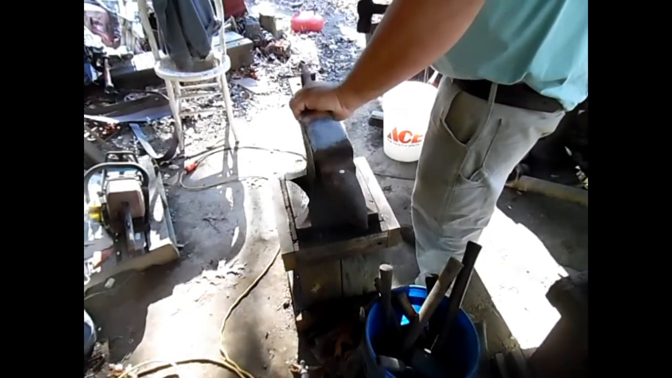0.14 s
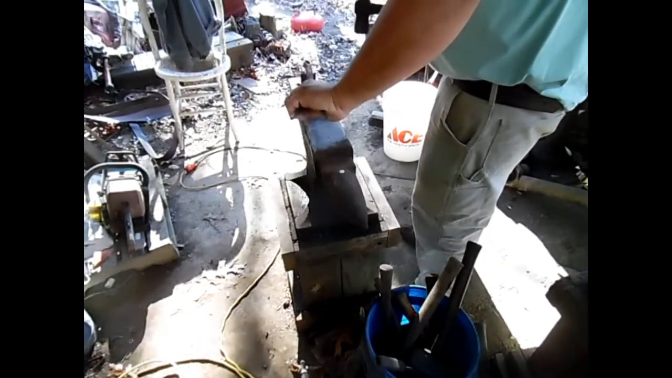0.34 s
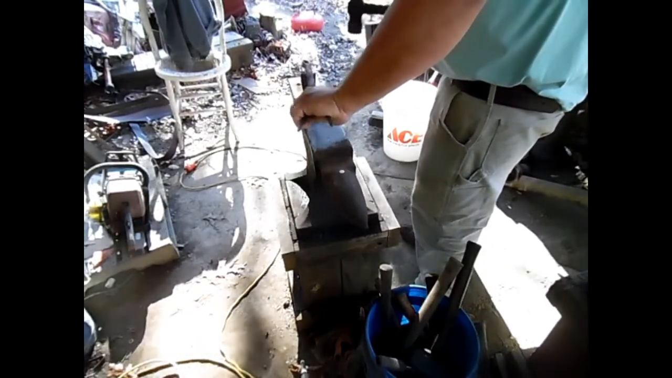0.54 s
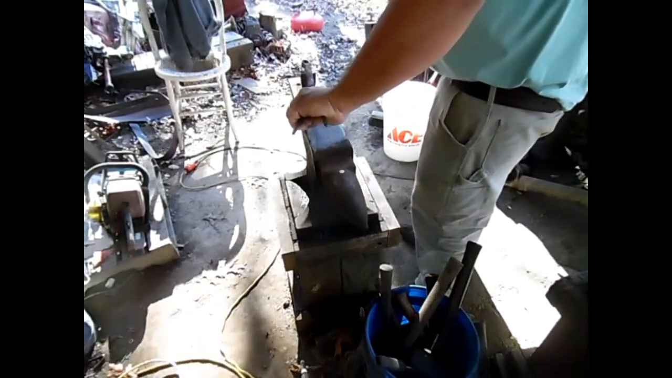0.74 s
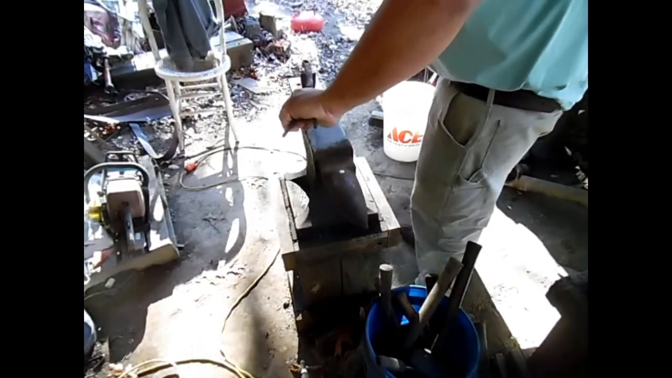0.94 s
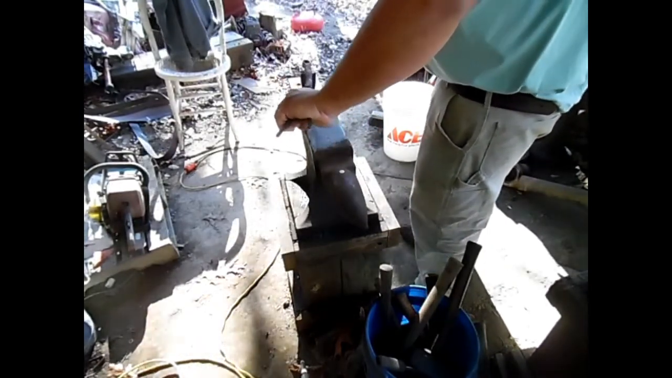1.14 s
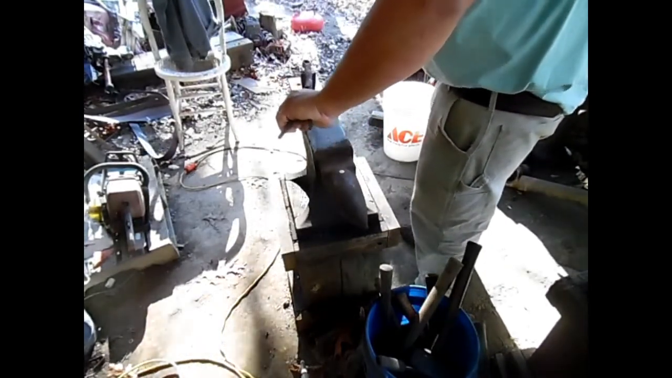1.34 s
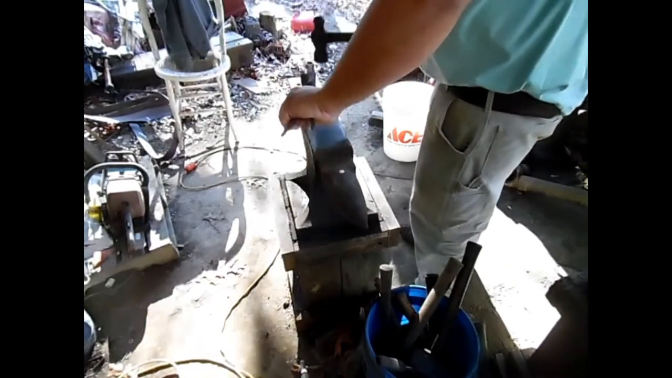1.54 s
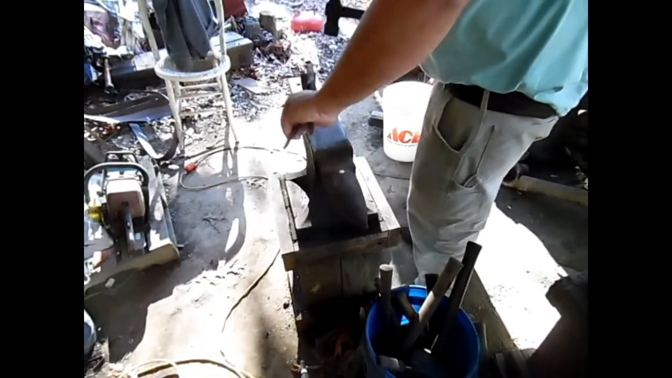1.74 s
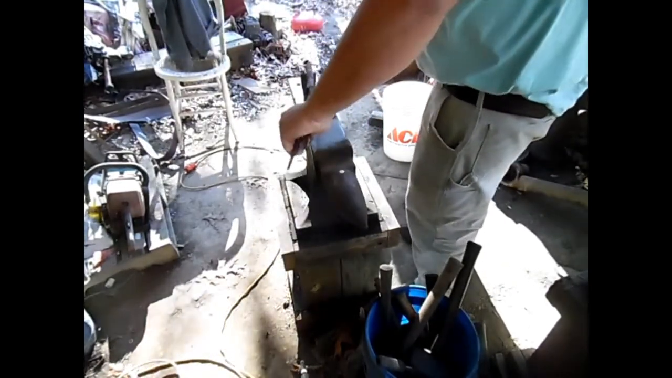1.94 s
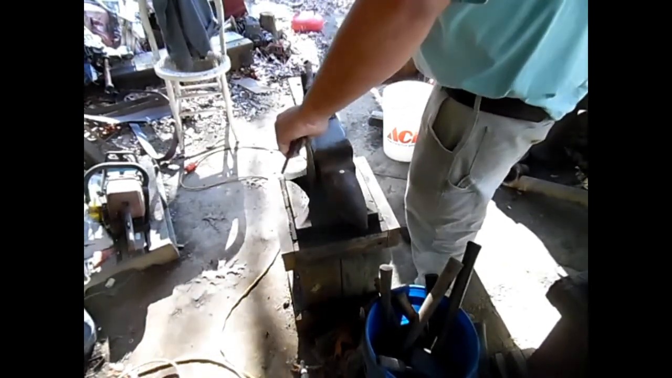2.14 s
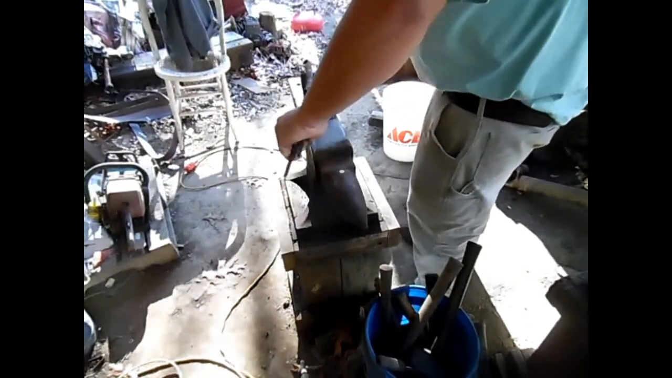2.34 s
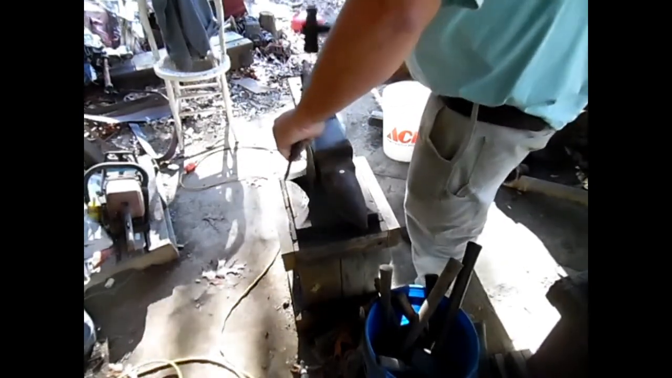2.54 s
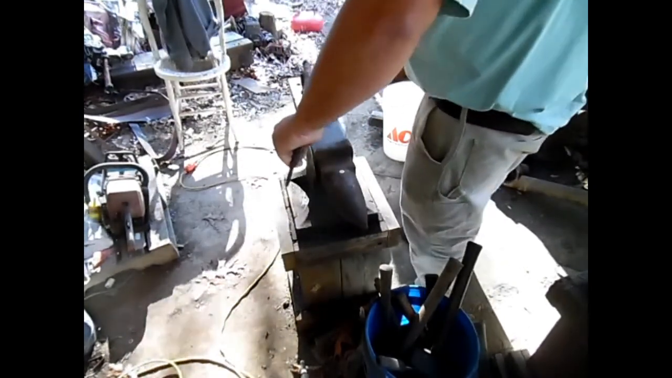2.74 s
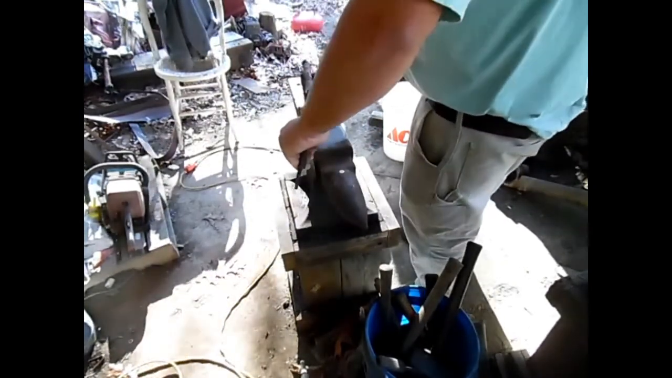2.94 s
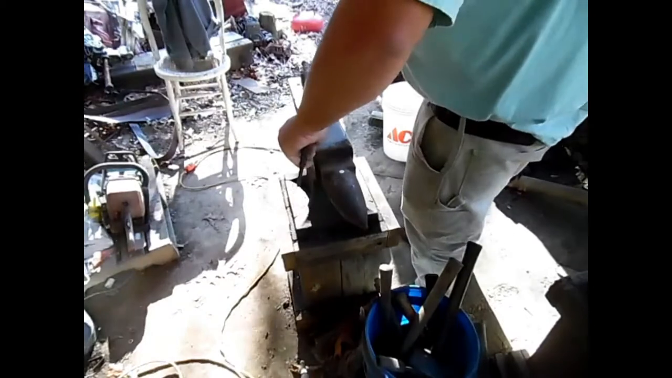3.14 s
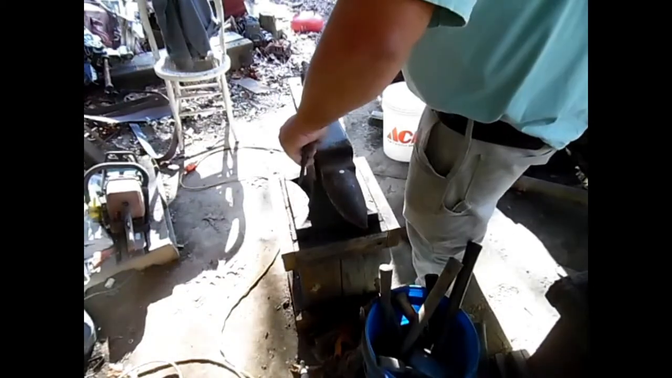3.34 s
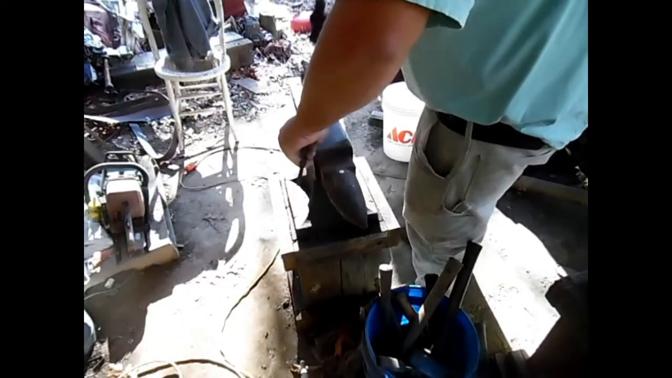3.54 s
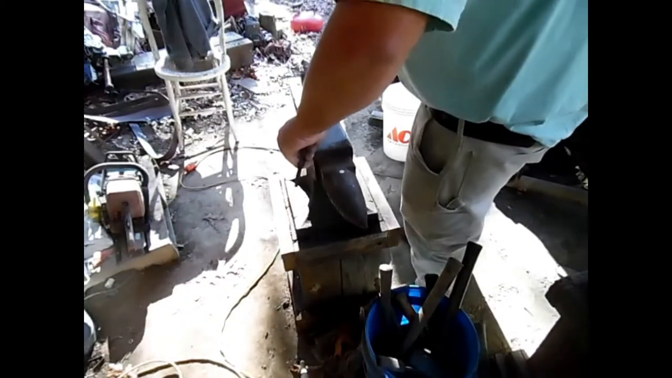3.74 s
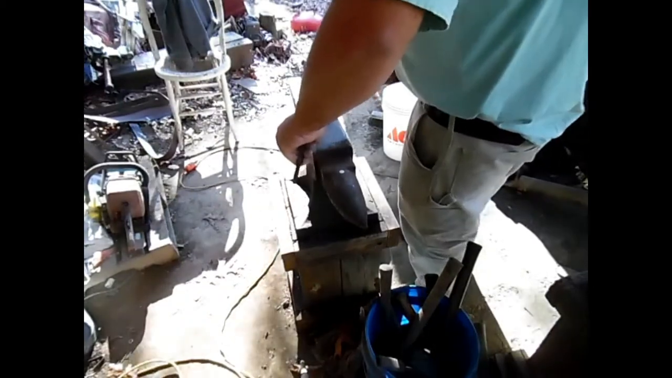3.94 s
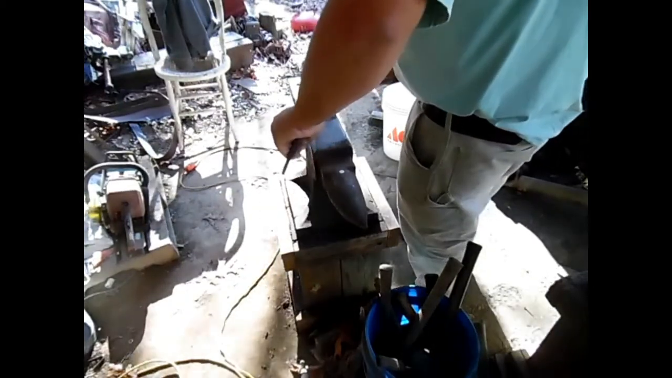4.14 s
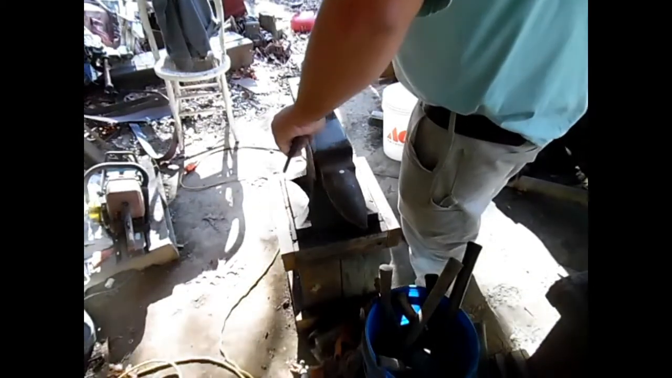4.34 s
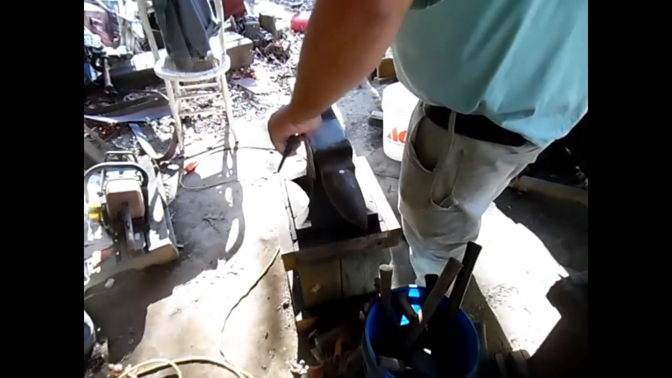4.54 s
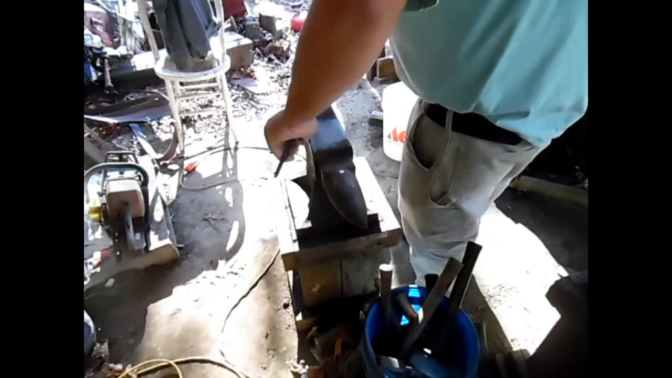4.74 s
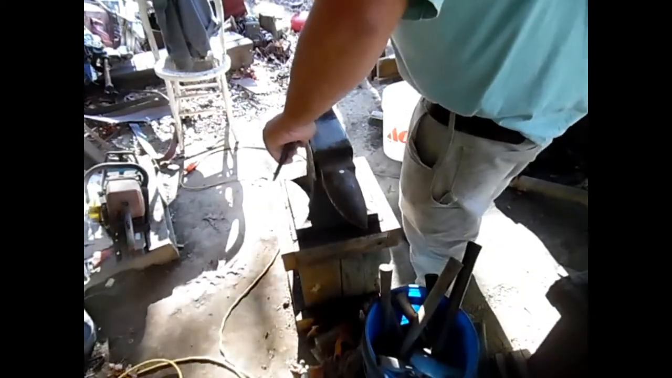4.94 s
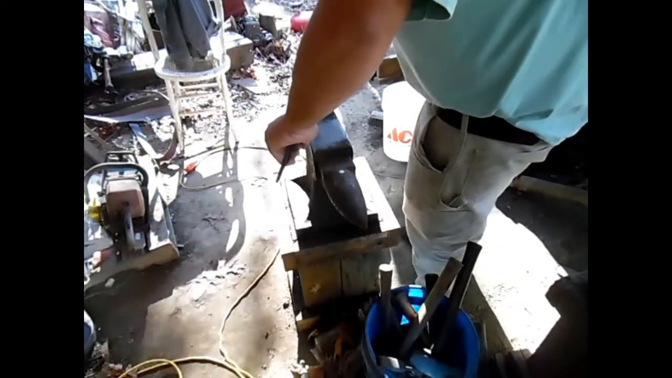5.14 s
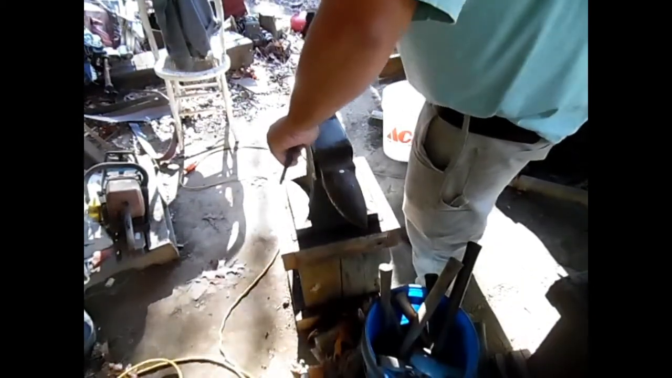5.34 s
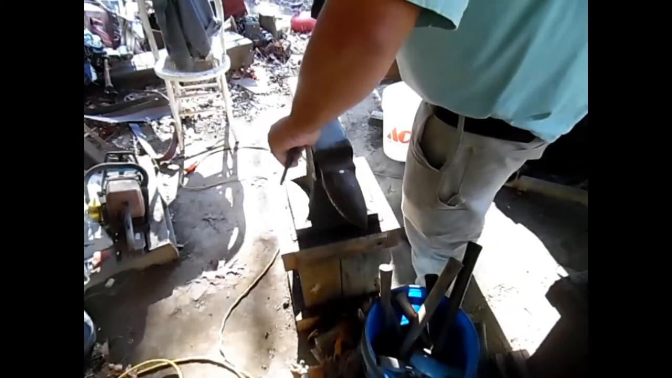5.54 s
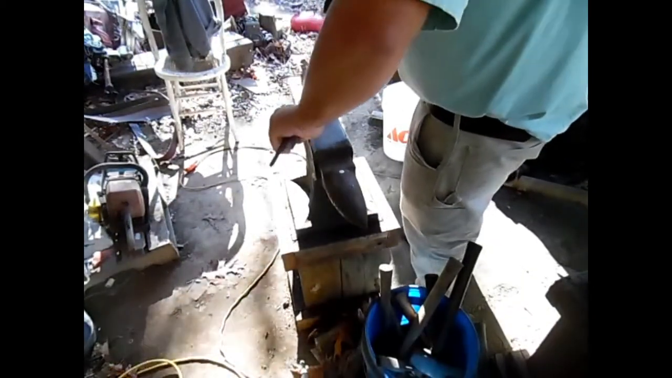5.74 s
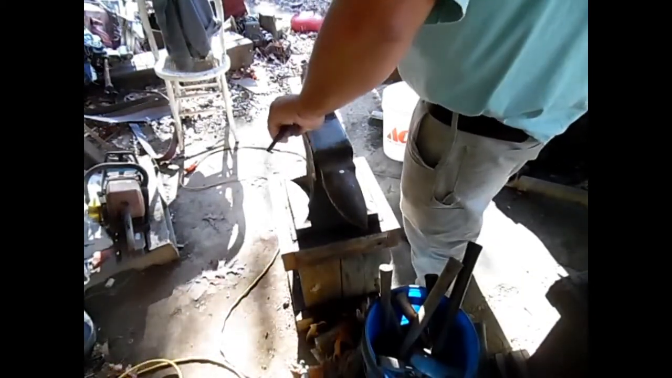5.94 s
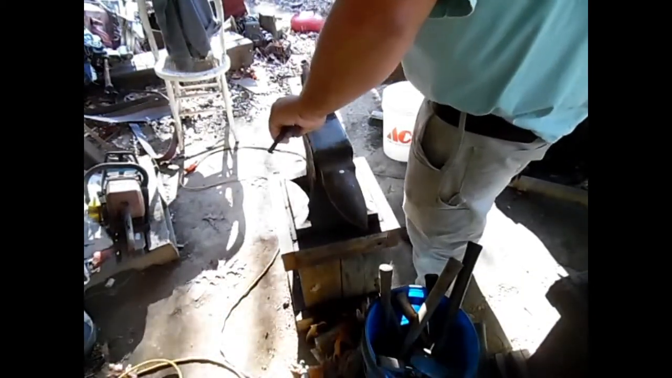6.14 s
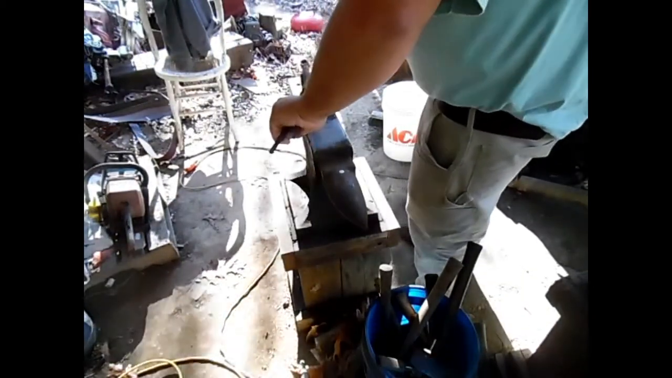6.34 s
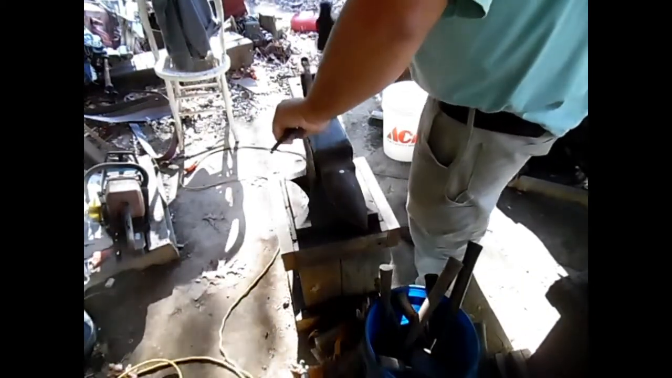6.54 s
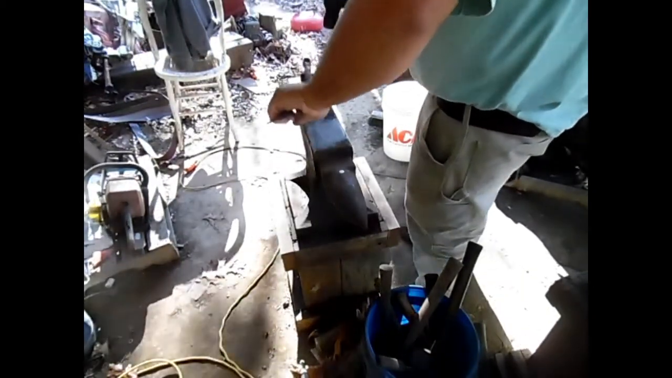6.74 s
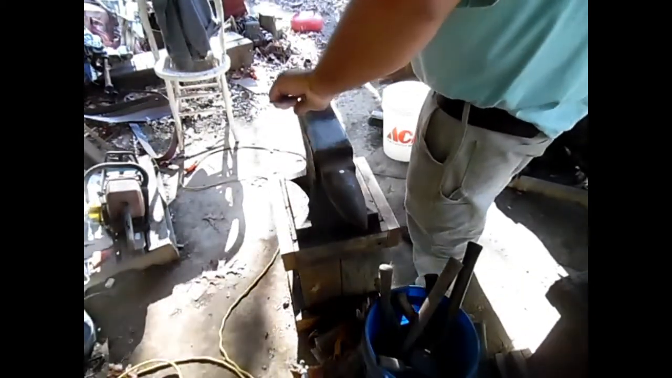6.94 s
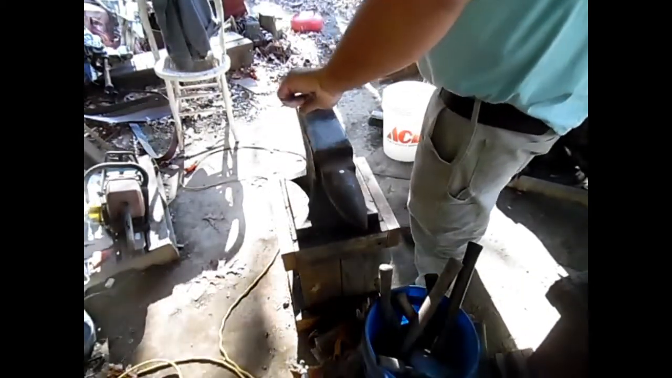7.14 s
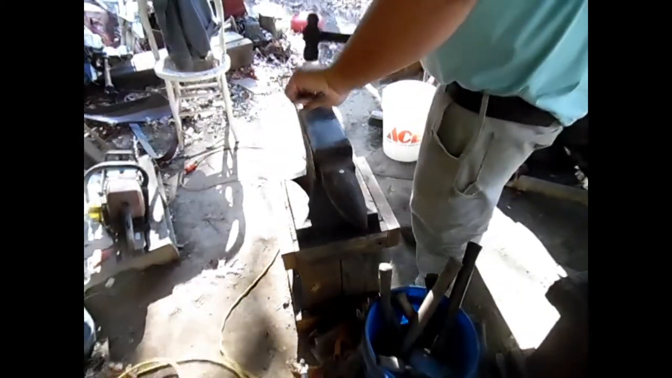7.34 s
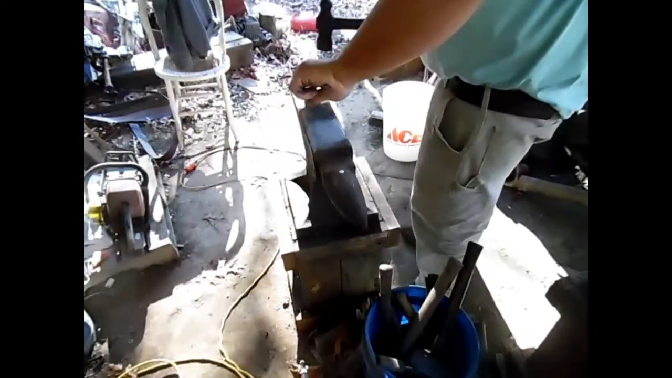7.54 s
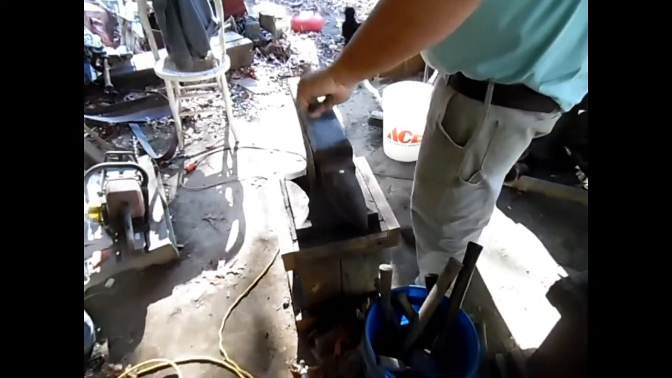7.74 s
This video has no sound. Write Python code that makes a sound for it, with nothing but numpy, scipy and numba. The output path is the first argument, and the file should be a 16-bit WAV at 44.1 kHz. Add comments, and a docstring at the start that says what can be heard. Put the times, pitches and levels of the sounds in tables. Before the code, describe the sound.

Wind starts to buffet the microphone with a low, fluttering rumble over the faint hiss and hum of a forge. Then a hammer lands on steel on a close anvil in an open shed: three sharp, briefly ringing blows about a second apart, a pause, and three more. A few tiny ticks fall in the pause, and faint thin squeals pass near the end as the wind turns raspier.

```python
"""Forging on an anvil

A smith draws out hot steel in an open shed: six hard blows and one light touch, each a crack of contact
and a short ring of the anvil's modes. Turbulent wind buffets the microphone, the forge hisses over its
humming blower, and faint ticks and gliding squeals pass. The blows overload the microphone's signal;
an automatic gain control pulls the level down and lets it creep back."""
import sys
import numpy as np
from scipy import signal
from scipy.fft import rfft, irfft, next_fast_len
from scipy.io import wavfile
from scipy.ndimage import uniform_filter1d
from numba import njit

SR = 44100
rng = np.random.default_rng(int(sys.argv[2]) if len(sys.argv) > 2 else 0)


def log_audio(samples):
    """Write samples as a 16-bit WAV file to the path given in sys.argv[1]."""
    # one column per channel
    frames = np.atleast_2d(samples).T
    # limit to full scale, then quantise
    limited = np.clip(frames, -1, 1)
    pcm = np.round(limited * 32767).astype(np.int16)
    wavfile.write(sys.argv[1], SR, pcm)


N = 344094

# spectra of fluttering eddies and of their rasping break-up: frequency_hz, density_db
FLUTTER_SPECTRUM = [(50, -15.5), (100, -1), (170, -1), (280, -8.5), (450, -24), (900, -46), (2000, -68.5),
                    (6000, -120)]
RASP_SPECTRUM = [(150, -12.5), (320, 7), (500, 2.5), (850, -8), (1500, -23.5), (2600, -41.5), (8000, -110)]


def hammering(ring_db=2.5, ring_rise_s=0.0053, sustain=1.033, crack_db=25, crack_t60_s=.07,
              scatter_db=2.5, beat_depth=0.24, beat_hz=12):
    """Impact excitation: a blow cracks and rings the anvil's modes, damped by the hot bar and stump."""
    # blows, and how the spot struck weights each register:
    # start_s, force_db, snap_db, clang_db, treble_db, top_db
    blows = [(1.5708, -3.5, -1, 0, 9, 4.5), (2.5548, 1.5, 0, -3, 2, 1), (2.806, -43.5, -59, 4.5, -21, -14),
             (3.5682, -11, -3.5, -6, 11, -9.5), (5.402, -2.5, -2, 2.5, 5.5, 11.5),
             (6.4921, -13, -4, 9, 12, 2), (7.429, -5, -2.5, 4, 3, 3.5)]
    # registers (clang, main ring, start and end of treble, top): frequency_hz
    registers_hz = [1460, 3700, 6000, 8800, 12400]
    # modes of anvil and hammer: pitch_hz, level_db, nominal_t60_s
    anvil_modes = [(1425, -12, .38), (1458, 17.5, .18), (2891, 19, .17), (3090, -7, .2), (3441, 2, .15),
                   (3718, 19, .16), (4263, 15, .18), (4512, 12.5, .16), (5360, -15, .58), (5475, -9, .2),
                   (5922, 6, .2), (5959, -8, .4), (6371, 0, .27), (6664, 7, .26), (7111, -5, .46),
                   (7181, -17, .58), (7366, -15, .62), (7425, -10, .54), (7908, -2, .27), (8443, -18, .45),
                   (8662, -21, .7), (9318, -12, .26), (9658, -19, .48), (10090, -15, .35), (10421, -2, .21),
                   (11670, -23, .42), (12000, -14, .3), (12458, -14, .68), (13090, -20, .35),
                   (15250, -20, .33)]
    # spectrum of the contact: frequency_hz, density_db
    crack_spectrum = [(40, 1), (90, 9), (200, 1), (400, 1.5), (560, -7.5), (800, 2.5), (1100, -6.5),
                      (2000, -3), (4000, 0), (7000, -3.5), (11000, -6.5), (15500, -17)]
    out, t = np.zeros(N), np.arange(SR) / SR
    hz, mode_db, t60 = np.transpose(anvil_modes)
    turns = hz[:, None] * t + rng.random((len(hz), 1))
    modes = np.sin(2 * np.pi * turns) * decay(t, sustain * t60[:, None]) * (1 - np.exp(-t / ring_rise_s))
    contact = decay(t, crack_t60_s) * (1 - np.exp(-t / 0.0019))
    for start_s, force_db, snap_db, clang_db, treble_db, top_db in blows:
        spot_db = np.interp(np.log(hz), np.log(registers_hz), [clang_db, 0, treble_db, treble_db, top_db])
        db = force_db + mode_db + spot_db + scatter_db * rng.standard_normal(len(hz))
        beats = 1 + beat_depth * np.sin(2 * np.pi * beat_hz * rng.uniform(-1, 1, (len(hz), 1)) * t)
        crack = undb(crack_db + snap_db) * noise(crack_spectrum, len(t)) * contact
        add(out, start_s, undb(ring_db + db) @ (modes * beats) + crack)
    return out


def shed(x, wet_db=-22, t60_s=0.31):
    """Reverberation: roof and clutter return a short, diffuse echo."""
    # spectrum of the echo: frequency_hz, density_db
    echo_spectrum = [(100, 3.5), (400, -0.5), (1500, -8), (3000, -7), (8000, -4.5), (15000, -12.5)]
    t = np.arange(SR // 2) / SR
    echo = noise(echo_spectrum, len(t)) * decay(t, t60_s) * (1 - np.exp(-t / 0.0014))
    echo /= np.sqrt(np.sum(echo ** 2))
    return x + undb(wet_db) * signal.oaconvolve(x, echo)[:N]


def wind(rumble_db=-1, flutter_db=-1, eddy_db=5.0, rasp_db=-23, gust_db=2, gusts_per_s=7):
    """Turbulence at the microphone: gusts rumble, quick eddies flutter, the strongest break into rasp."""
    # spectrum of the gusts: frequency_hz, density_db
    rumble_spectrum = [(8, -22), (22, 2), (42, -3.5), (80, -5.5), (130, -19), (300, -50.5), (2000, -130)]
    low_db, high_db = wind_levels(np.arange(N) / SR)
    gusts = undb(gust_db * wander(gusts_per_s))
    eddies = eddy_db * wander(50)
    rumble = undb(low_db + rumble_db) * steady(noise(rumble_spectrum) * undb(0.87 * eddies), 0.2)
    flutter = undb(flutter_db) * steady(noise(FLUTTER_SPECTRUM) * undb(eddies), 0.41)
    rasp = undb(rasp_db) * steady(noise(RASP_SPECTRUM) * undb(1.5 * eddies), 0.23)
    return gusts * (rumble + undb(high_db) * (flutter + rasp))


def wind_levels(time_s):
    """Slow envelopes of rumble and flutter, in dB."""
    # course of the wind: time_s, strength_db, relative_flutter_db
    course = [(0.0, -39.5, -6), (0.35, -37.5, -4), (0.52, -21.5, -4.5), (0.78, -31, 0), (0.958, -11, -10.5),
              (1.4, -12, -4), (1.56, -17.5, -14.5), (2.101, -11.5, -15), (2.4, -18, -8.5),
              (3.15, -6.5, -17), (3.5, -10, -10), (4.25, -5, -14.5), (5.1, -15.5, -8.5), (5.7, -8, -10.5),
              (6.35, -7, -4.5), (6.951, -15.5, -6.5), (7.4, -9.5, -8.5), (7.8, -31.5, -14)]
    times, strength_db, relative_db = np.transpose(course)
    return np.interp(time_s, times, strength_db), np.interp(time_s, times, strength_db + relative_db)


def buffets(spike_db=5, spike_s=0.0012, thump_db=-3.5, crackle_db=5.5):
    """Vortex impact on the microphone port: a pressure spike, then a short crackling wake."""
    # strongest vortices: time_s, low_db, high_db, swell_s
    vortices = [(0.555, -18, -43, 0.0082), (0.857, -6.5, -25, 0.01), (0.906, -10, -44, .008),
                (1.161, -5, -19, 0.0075), (1.243, -20, -11.5, 0.0045), (1.273, -14.5, -15, 0.0034),
                (1.337, -12, -19, 0.0036), (1.437, -4.5, -47, 0.0053), (1.466, -9.5, -38, 0.0062),
                (2.149, -6.5, -46, 0.0055), (3.502, -6.5, -22, 0.015), (4.08, -6.5, -14.5, 0.0075),
                (4.251, -3.5, -28, 0.0076), (4.421, -11.5, -12, 0.0085), (4.491, -9, -10.5, .007),
                (4.759, -14.5, -28, 0.0049), (4.934, -9.5, -53, 0.006), (5.294, -6.5, -11.5, 0.0093),
                (5.548, -7, -10.5, 0.005), (5.86, -19.5, -19, 0.032), (6.152, -9, -14.5, 0.014),
                (6.32, -14, -10.5, .018), (6.40, -11.5, -13, 0.024), (6.57, -12, -4.5, 0.011),
                (6.745, -17, -15, 0.018), (6.825, -8, -7.5, 0.024), (7.128, -12, -15, 0.007),
                (7.167, -5.5, -10.5, 0.008), (7.343, -12.5, -13, .007), (7.402, -16, -19.5, 0.012)]
    spikes, thumps, rasps = np.zeros((3, N))
    t = np.arange(SR // 5) / SR
    u = (np.arange(SR // 10) - SR // 20) / SR / spike_s  # time from the peak, in spike widths
    spike = (1 - u ** 2 / 2) / (1 + u ** 2 / 2) ** 2 * np.hanning(len(u))
    for time_s, low_db, high_db, swell_s in list(vortices) + lesser_vortices():
        swell = t / swell_s * np.exp(1 - t / swell_s)
        add(spikes, time_s - len(u) / SR / 2, rng.choice([-1, 1]) * undb(low_db + spike_db) * spike)
        add(thumps, time_s - swell_s, undb(low_db + thump_db) * swell)
        add(rasps, time_s - swell_s, undb(high_db) * swell ** 2)
    wake = steady(noise(FLUTTER_SPECTRUM), 0.0083)
    crackle = steady(noise(RASP_SPECTRUM) * undb(crackle_db * wander(400)), 0.023)
    return spikes + thumps * wake + rasps * crackle


def lesser_vortices(count=36, thump_db=-1, rasp_db=-5, spread_db=3, swell_s=0.011):
    """Intermittency: small vortices arrive at random, their strength following the flutter."""
    times = (np.arange(count) + rng.random(count)) / count * N / SR
    levels_db = wind_levels(times)[1][:, None] + spread_db * rng.standard_normal((count, 2))
    return [(time_s, low_db + thump_db, high_db + rasp_db, swell_s)
            for time_s, (low_db, high_db) in zip(times, levels_db)]


def forge(hiss_db=-32.5, flicker_db=1):
    """Broadband noise: fire hisses over the blower's hum; the background hiss rises briefly once."""
    # spectrum of the fire: frequency_hz, density_db
    fire_spectrum = [(20, -1), (60, -1.5), (130, -12), (260, -10.5), (500, -10.5), (1170, -18.5),
                     (1820, -21.5), (2500, -25.5), (5000, -30), (9000, -35), (10500, -35.5), (12000, -39.5),
                     (15500, -46.5)]
    # partials of the blower: pitch_hz, level_db
    partials = [(53.8, -41.5), (161.5, -37.5), (215.3, -54), (269.2, -48.5)]
    # brief rise of the background hiss: middle_s, length_s, rise_db
    hiss_rise = (2.48, .26, 6)
    t = np.arange(N) / SR
    hum = sum(undb(db) * np.sin(2 * np.pi * hz * t + .5 * wander(0.97)) for hz, db in partials)
    middle_s, length_s, rise_db = hiss_rise
    rise = np.exp(-(2 * (t - middle_s) / length_s) ** 6)
    return undb(hiss_db + rise_db * rise + flicker_db * wander(18)) * noise(fire_spectrum) + hum


def ticks(t60_s=0.064):
    """Transients: bright noise that decays quickly is heard as a dry tick."""
    # small ticks: start_s, level_db
    events = [(1.15, -45), (2.372, -39), (4.79, -45.5), (4.945, -36), (4.989, -33)]
    spectrum = [(1500, -25), (6000, -4.0), (9500, 1.0), (15000, -11.5)]  # frequency_hz, density_db
    out, t = np.zeros(N), np.arange(SR // 4) / SR
    for start_s, level_db in events:
        add(out, start_s, undb(level_db) * noise(spectrum, len(t)) * decay(t, t60_s))
    return out


def squeals(waver=.004):
    """Frequency modulation: thin, distant tones glide and waver."""
    # squeals: start_s, length_s, first_hz, last_hz, level_db
    glides = [(6.226, 0.32, 2540, 2056, -44), (6.343, 0.14, 2830, 2500, -42),
              (6.348, 0.31, 4240, 3670, -46.5), (7.292, 0.061, 828, 900, -32),
              (7.318, 0.14, 1870, 2120, -41)]
    out = np.zeros(N)
    for start_s, length_s, first_hz, last_hz, level_db in glides:
        n = int(length_s * SR)
        hz = np.linspace(first_hz, last_hz, n) * (1 + waver * wander(90)[:n])
        tone = np.sin(2 * np.pi * np.cumsum(hz) / SR)
        add(out, start_s, undb(level_db) * tone * np.sqrt(np.hanning(n)))
    return out


def undb(db):
    """Decibels to amplitude ratio."""
    return 10 ** (np.asarray(db) / 20)


def noise(spectrum, size=N):
    """Spectral shaping: noise of rms 1 coloured by (frequency_hz, density_db) points."""
    hz, db = np.transpose(spectrum)
    n = next_fast_len(size, True)
    bins_hz = np.maximum(np.fft.rfftfreq(n, 1 / SR), 1)
    gain = undb(np.interp(np.log(bins_hz), np.log(hz), db))
    x = irfft(rfft(rng.standard_normal(n)) * gain, n)[:size]
    return x / x.std()


def wander(rate_hz):
    """Random modulation: steps smoothed twice, with standard deviation 1."""
    hold = int(SR / rate_hz)
    steps = np.repeat(rng.standard_normal(N // hold + 1), hold)
    x = uniform_filter1d(uniform_filter1d(steps, hold), hold)[:N]
    return x / x.std()


def steady(x, span_s):
    """Normalisation: holds the running rms near 1."""
    return x / np.sqrt(uniform_filter1d(x ** 2, int(span_s * SR)) + 1e-9)


def decay(t, t60_s):
    """Exponential damping, by 60 dB in t60_s."""
    return np.exp(-np.log(1000) * t / t60_s)


def add(out, start_s, x):
    """Superposition of x on out from start_s."""
    i = max(int(start_s * SR), 0)
    out[i:i + len(x)] += x[:max(N - i, 0)]


def scene():
    """Pressures sum at one microphone, so both channels are alike."""
    return np.tile(shed(hammering()) + wind() + buffets() + forge() + ticks() + squeals(), (2, 1))


@njit
def gain_reduction(over_db, attack_s, hold_s, release_s):
    """Peak following: the cut in dB climbs towards the latest peak, holds, then relaxes."""
    cut, goal, now, wait = np.empty(len(over_db)), 0., 0., 0.
    for i in range(len(over_db)):
        if over_db[i] > goal:
            goal, wait = over_db[i], hold_s
        elif wait > 0:
            wait -= 1 / SR
        else:
            goal -= goal / (release_s * SR)
        now += (goal - now) / (attack_s * SR)
        cut[i] = now
    return cut


def gain_control(x, threshold_db=-13, slope=0.8, attack_s=0.054, hold_s=0.39, release_s=0.72):
    """Compression: the gain falls by a share of the level above the threshold."""
    level_db = 10 * np.log10(np.abs(uniform_filter1d(x ** 2, SR // 200)) + 1e-12)
    return x * undb(-gain_reduction(slope * (level_db - threshold_db), attack_s, hold_s, release_s))


def record(dry, ceiling_db=-1.2, cutoff_hz=15800):
    """Saturation: the blows outrun the gain control and clip softly; a low-pass limits the band."""
    x = gain_control(dry[0])
    clipped = x / (1 + (x / undb(ceiling_db)) ** 4) ** (1 / 4)
    lowpass = signal.ellip(10, .1, 80, cutoff_hz, fs=SR, output="sos")
    return np.tile(signal.sosfilt(lowpass, clipped), (2, 1))


dry = scene()
out = record(dry)
log_audio(out)
```